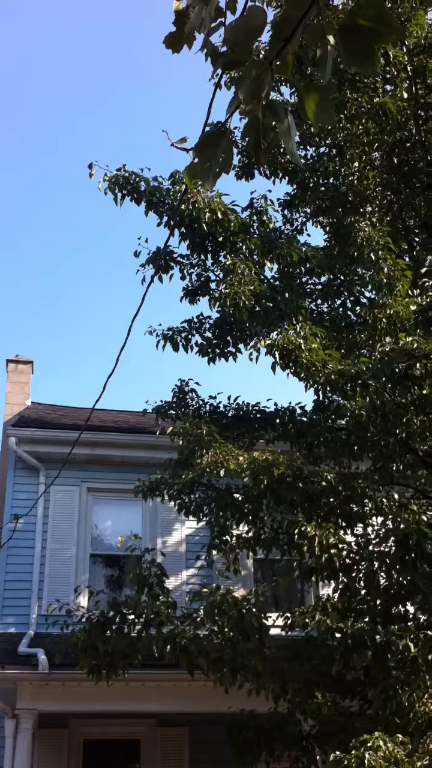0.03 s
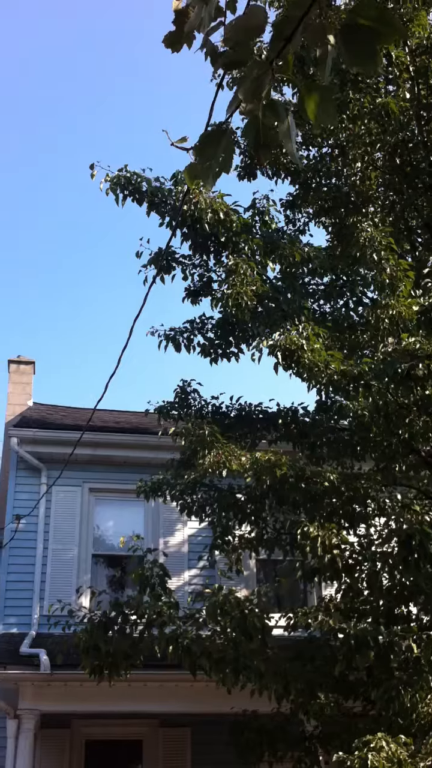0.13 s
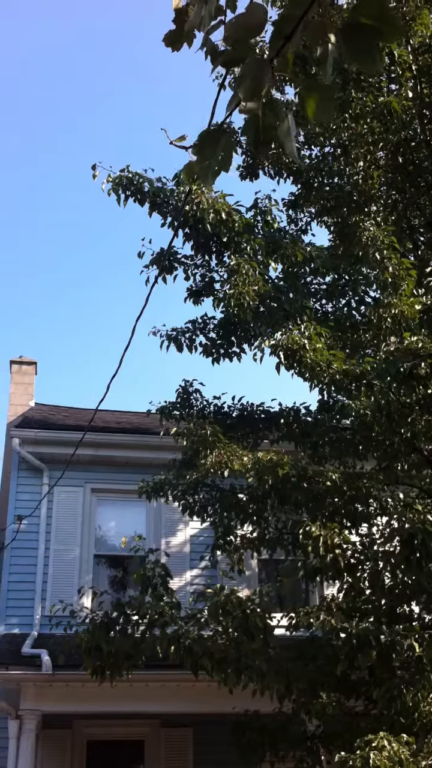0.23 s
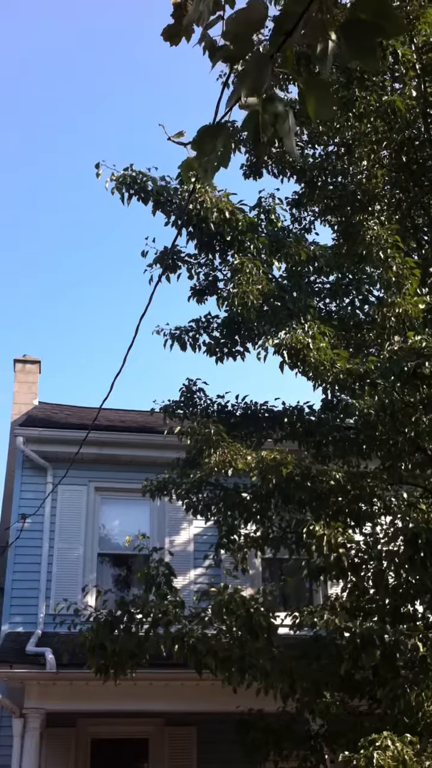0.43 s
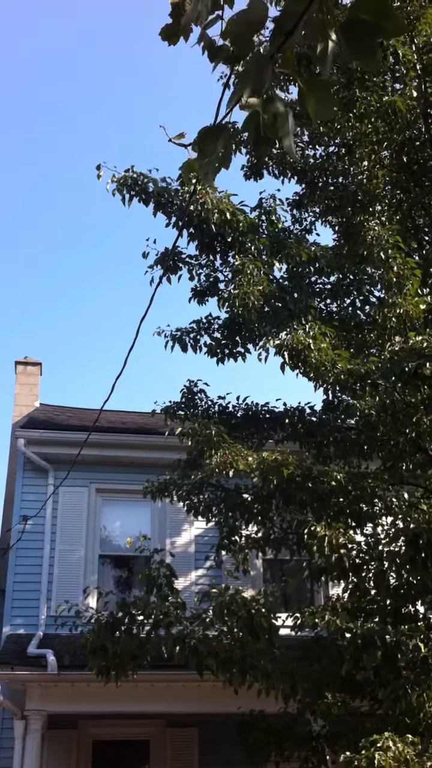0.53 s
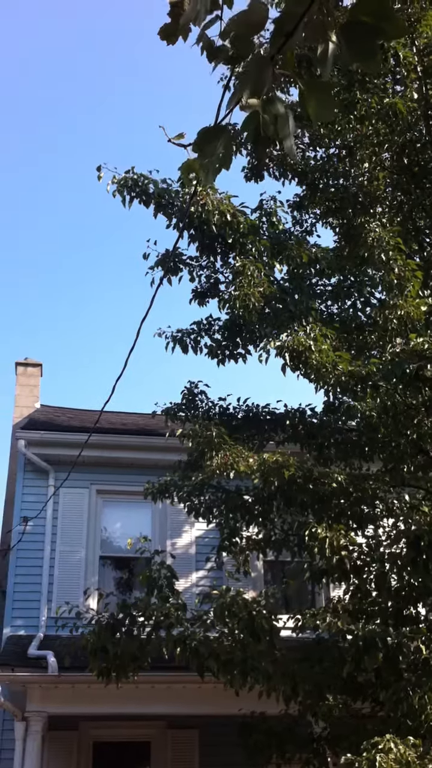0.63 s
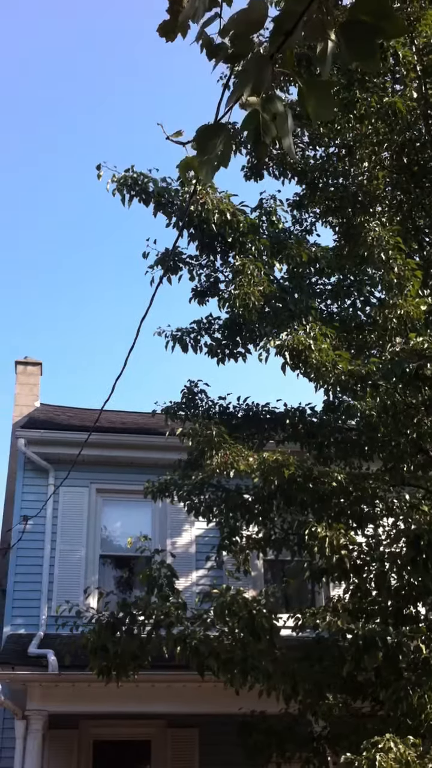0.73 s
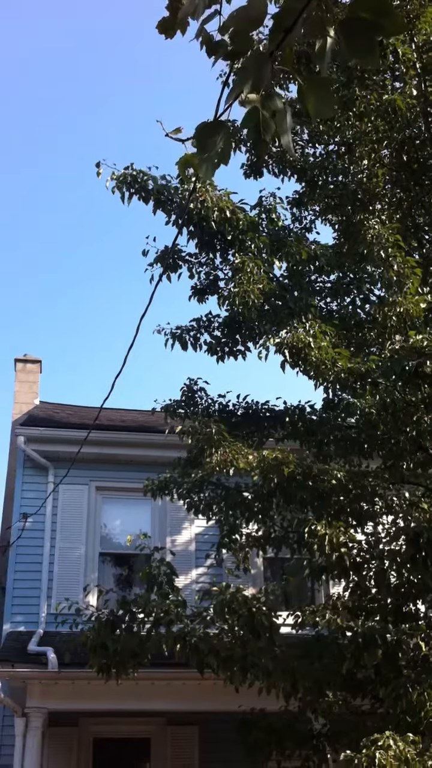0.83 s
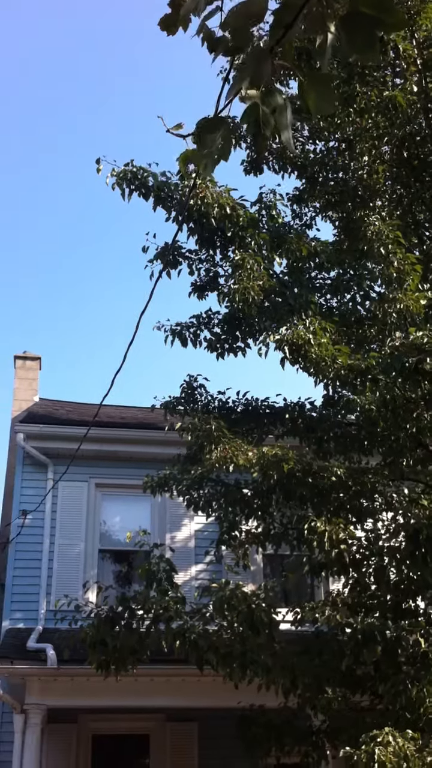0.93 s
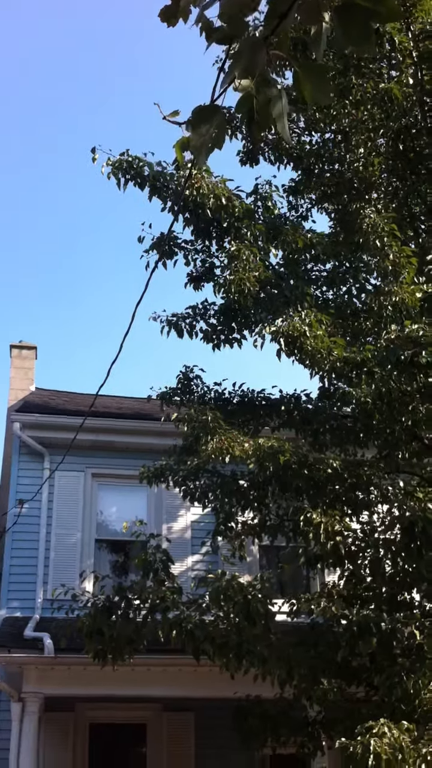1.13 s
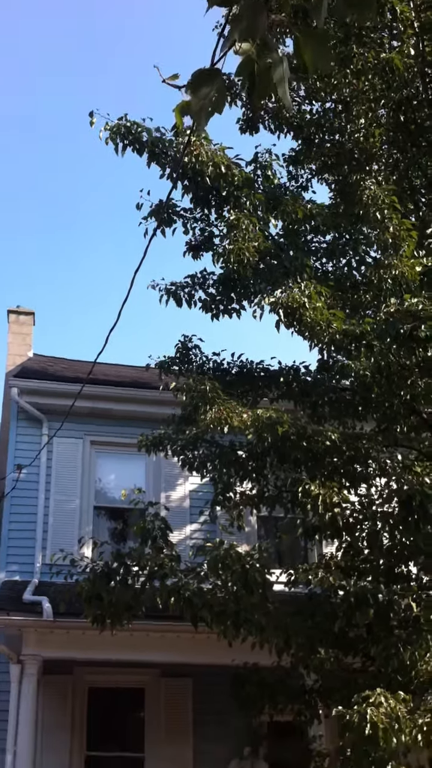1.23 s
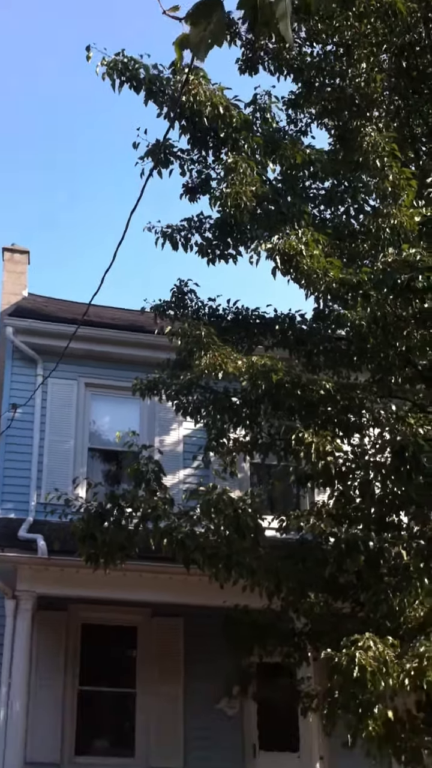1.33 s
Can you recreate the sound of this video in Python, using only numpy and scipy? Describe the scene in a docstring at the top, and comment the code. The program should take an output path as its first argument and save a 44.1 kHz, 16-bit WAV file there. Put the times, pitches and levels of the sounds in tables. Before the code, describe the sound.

One sharp acorn knock on a parked car, with a hard crack, dull metal thud and brief ring scattering among houses; faint insects and distant town hum surround it, then a small bird twitters. Single outdoor microphone.

```python
"""A quiet street, the same in both channels: after a moment of silence a distant town rumbles and hums,
insects buzz in the trees (bands of noise) and leaves tick now and then (bursts of bright noise).
Then an acorn drops on a parked car: its shell cracks (noise and short sines), the sheet metal thuds
(rounded pulses) and rings (dying sines), and the knock scatters among the houses (fading noise).
Last, a small bird twitters in short gliding whistles, with a scattered echo."""
import sys
import numpy as np
from scipy import signal
from scipy.fft import rfft, irfft, next_fast_len
from scipy.io import wavfile

SR = 44100
rng = np.random.default_rng(int(sys.argv[2]) if len(sys.argv) > 2 else 0)


def pcm_store(signal):
    """Save signal as 16-bit PCM."""
    levels = np.round(np.clip(np.atleast_2d(signal), -1, 1) * 32767)
    wavfile.write(sys.argv[1], SR, levels.astype(np.int16).T)


N = 61739
HIT_S = 0.4699  # the acorn meets the car


def from_db(db):
    """Turn decibels into a gain."""
    return 10 ** (np.asarray(db) / 20)


def rms_one(x):
    """Scale to an rms (average strength) of 1."""
    return x / np.sqrt(np.mean(x ** 2) + 1e-20)


def since(s):
    """Seconds gone by since a moment, zero before it."""
    return np.maximum(np.arange(N) / SR - s, 0)


def dying(t, t60):
    """Fade steadily, by 60 dB in every t60 seconds."""
    return np.exp(-np.log(1000) * t / t60)


def at_hz(points, hz):
    """Read a table between its points, with frequency on a log scale."""
    points = np.array(points)
    return np.interp(np.log(np.maximum(hz, 1)), np.log(points[:, 0]), points[:, 1])


def noise(gain_at):
    """Noise shaped by a gain per root Hz, given as a function of frequency."""
    size = next_fast_len(N)
    white = rfft(rng.standard_normal(size))
    hz = np.arange(len(white)) * SR / size
    return irfft(white * gain_at(hz), size)[:N] * np.sqrt(SR / 2)


def narrow(hz, width):
    """A narrow, steep-sided band of noise with an rms of 1."""
    return rms_one(noise(lambda f: 1 / (1 + (2 * (f - hz) / width) ** 4)))


def drift(rate):
    """Random movement, mostly slower than the rate in Hz, with an rms of 1."""
    return rms_one(noise(lambda f: 1 / (1 + (f / rate) ** 2)))


def ring(t, hz, t60):
    """A dying sine."""
    return np.sin(2 * np.pi * hz * t) * dying(t, t60)


def shell():
    """Each contact of the shell is a short crack of noise and a few cycles of hard, bright ring."""
    # contacts of the shell: (time after the hit [s], level [dB], crack's decay constant [s])
    contacts = [(0.0, -3.5, .0015), (.0018, -1, .002)]
    # ring at the point of impact: (pitch [Hz], level relative to the contact's [dB], t60 [s])
    shell_modes = [(2810, -28, 0.013), (3150, -49, 0.009), (2080, -38.5, 0.017), (4730, -35, 0.0087),
                   (5920, -41, 0.0084), (7600, -52, .008)]
    crack_db, crack_low_hz, crack_high_hz = -36, 2000, 6000
    colour = signal.butter(1, [crack_low_hz, crack_high_hz], "band", fs=SR, output="sos")
    out = np.zeros(N)
    for delay, contact_db, length in contacts:
        t = since(HIT_S + delay)
        burst = rng.standard_normal(N) * (t > 0) * np.exp(-t / length)
        crack = signal.sosfilt(colour, burst + 1e-18)  # the tiny offset keeps the filter off exact zero
        ringing = sum(from_db(db) * ring(t, hz, t60) for hz, db, t60 in shell_modes)
        out += from_db(contact_db) * (from_db(crack_db) * crack + ringing)
    return out


def thump():
    """The panel flexes in rounded pushes of about one cycle: dull thuds and their returns."""
    # thuds: (time of the middle [s], level [dB], strongest frequency [Hz])
    thuds = [(.4776, -31, 400), (.4822, -33, 340), (.4924, -37, 330), (.504, -32, 360), (.513, -36, 600)]
    t, out = np.arange(N) / SR, np.zeros(N)
    for s, db, hz in thuds:
        u = (np.pi * hz * (t - s)) ** 2
        out += from_db(db) * (1 - 2 * u) * np.exp(-u)
    return out


def panel():
    """The sheet metal rings on in its clear modes, each a sine that builds up quickly and dies."""
    # modes of the panel: (pitch [Hz], level [dB], t60 [s])
    panel_modes = [(153, -54, .4), (168, -52, .45), (196, -48, .35), (237, -41.5, .46), (312, -45, .28),
                   (346, -46, .3), (373, -46, .3), (444, -48, .3), (663, -43, .42), (782, -51, .3),
                   (823, -51, .3), (1739, -53, .25), (2218, -53, .28), (2988, -54, .25)]
    rise_s = 0.004  # time constant
    t = since(HIT_S)
    modes = sum(from_db(db) * ring(t, hz, t60) for hz, db, t60 in panel_modes)
    return modes * (1 - np.exp(-t / rise_s))


def body():
    """Countless modes and street reflections blur into noise; each band swells, holds and dies."""
    # dense ring of the car body and its scatter: (frequency [Hz], level [dB per Hz])
    body_levels = [(60, -108), (100, -97), (150, -74), (240, -62), (560, -79.5), (730, -68), (1050, -74),
                   (1400, -82), (1900, -73.5), (2800, -75.5), (3900, -82.5), (4900, -78.5), (7200, -86),
                   (9000, -93.5), (10200, -103), (13000, -92.5), (16000, -101)]
    # how fast it dies: (frequency [Hz], t60 [s])
    body_t60 = [(150, 0.41), (400, 0.57), (1000, 0.29), (2500, 0.42), (6000, 0.37), (14000, 0.4)]
    hold_s = 0.019  # no fading yet while reflections arrive
    rise_at_1khz_s = 0.0021  # time constant; low bending waves spread more slowly
    grain_hz, grain_db = 250, 0.5  # the reflections arrive in uneven clumps
    grain = rms_one(from_db(grain_db * drift(grain_hz)))
    t, out = since(HIT_S), np.zeros(N)
    held = since(HIT_S + hold_s)
    for hz in 1000 * 2. ** np.arange(-4, 5):
        def band_gain(f):
            # neighbouring bands overlap and share the power, one octave to each side
            share = np.maximum(1 - abs(np.log2((f + 1) / hz)), 0)
            return from_db(at_hz(body_levels, f)) * np.sqrt(share)

        band = noise(band_gain)
        rise = rise_at_1khz_s * 1000 / hz
        clumps = grain if hz >= 1000 else 1  # only the upper bands are grainy
        out += band * clumps * (1 - np.exp(-t / rise)) * dying(held, at_hz(body_t60, hz))
    return out


def bird():
    """Short whistles whose pitch arches up and down, scattered by the trees as a noisy echo."""
    # notes: (time [s], length [s], top pitch [Hz], rise at the start [Hz], fall at the end [Hz], level [dB])
    notes = [(0.817, .022, 4430, 30, 200, -59.5), (0.857, 0.029, 4750, 200, 755, -56.5),
             (0.906, 0.028, 4710, 150, 660, -55.5), (0.963, 0.017, 4710, 450, 200, -55),
             (0.984, .034, 4550, 590, 40, -60), (1.016, 0.066, 4630, 20, 40.5, -63)]
    scatter_db, scatter_t60_s = -10, 0.3
    out = np.zeros(N)
    for s, length, top, rise, fall, db in notes:
        u = np.clip(since(s) / length, 0, 1)  # 0 to 1 through the note
        hz = top - rise * (1 - u) ** 3 - fall * u ** 4
        whistle = np.sin(2 * np.pi * np.cumsum(hz) / SR)
        out += from_db(db) * np.sin(np.pi * u) * whistle
    scatter = rng.standard_normal(N) * dying(since(0), scatter_t60_s)
    echo = signal.fftconvolve(out, scatter / np.linalg.norm(scatter))[:N]
    return out + from_db(scatter_db) * echo


def insects():
    """Many far insects merge into narrow bands of noise that swell and throb unevenly."""
    # choruses: (centre [Hz], width [Hz], level before the swells [dB])
    choruses = [(6632, 255, -65), (6957, 420, -65), (4470, 510, -71.5)]
    # swells: (time [s], change of the first, second and third chorus [dB, dB, dB])
    swell_points = [(.17, -12, -1, -5), (.25, 7, -2.5, 4), (.34, -3, -2, -6), (.68, -4.5, -0.5, 3),
                    (.86, 5.5, -2.5, -8), (1.01, -10, -2, 1), (1.11, 4, 0.5, -2), (1.27, -11, -0.5, -13),
                    (1.38, 4.5, 1.5, 1)]
    throb_hz, throb_db = 35, 1.5
    s, *swells = np.transpose(swell_points)
    out = np.zeros(N)
    for (hz, width, db), swell in zip(choruses, swells):
        buzz = narrow(hz, width)
        level = from_db(db + np.interp(since(0), s, swell))
        throb = rms_one(from_db(throb_db * drift(throb_hz)))
        out += buzz * level * throb
    return out


def leaves():
    """Tiny dry ticks among the leaves: bursts of noise with the lows filtered away."""
    # ticks: (time [s], level before the filter [dB])
    ticks = [(.333, -68), (.684, -58.5), (.989, -61.5), (1.222, -59.5), (1.375, -55)]
    t60_s, low_hz = 0.08, 3000
    level = sum(from_db(db) * (since(s) > 0) * dying(since(s), t60_s) for s, db in ticks)
    bright = signal.butter(1, low_hz, "high", fs=SR, output="sos")
    return signal.sosfilt(bright, level * rng.standard_normal(N) + 1e-18)


def town():
    """Steady noise for far rumble and leaf hiss, a narrow noise drone and wavering machine tones."""
    # distant town and leaves: (frequency [Hz], level [dB per Hz])
    air = [(25, -113), (50, -108), (75, -98), (110, -84.5), (170, -81), (300, -84), (700, -88), (1100, -91),
           (1600, -95.5), (2200, -98), (2800, -101), (4000, -101), (5300, -103), (6200, -101.5),
           (7700, -107.5), (9100, -107.5), (11000, -111.5), (13500, -109.5), (16000, -110.5)]
    # hum of far machinery: (pitch [Hz], rms level [dB])
    hum_tones = [(478, -70), (821, -73.5), (1054, -71.5), (1345, -77.5), (1464, -77.5), (1523, -72),
                 (2228, -80)]
    drone_hz, drone_width_hz, drone_db = 238, 17.4, -65.5
    waver_hz, waver_rate_hz = 1.72, 10.5  # size and speed of the pitch wander
    hum = np.zeros(N)
    for hz, db in hum_tones:
        pitch = hz + waver_hz * drift(waver_rate_hz)
        hum += from_db(db) * rms_one(np.sin(2 * np.pi * np.cumsum(pitch) / SR))
    rumble_and_hiss = noise(lambda f: from_db(at_hz(air, f)))
    drone = from_db(drone_db) * narrow(drone_hz, drone_width_hz)
    return rumble_and_hiss + drone + hum


def scene():
    """The knock in its street, the same in both channels."""
    knock = shell() + thump() + panel() + body()
    mono = knock + bird() + insects() + leaves() + town()
    return np.array([mono, mono])


def record(dry):
    """One microphone: silent until the start, with the highest treble cut off steeply."""
    start_s, cutoff_hz = 0.084, 15650
    live = dry * (since(start_s) > 0)
    low_pass = signal.ellip(10, .1, 70, cutoff_hz, fs=SR, output="sos")
    return signal.sosfilt(low_pass, live)


dry = scene()
out = record(dry)
pcm_store(out)
```